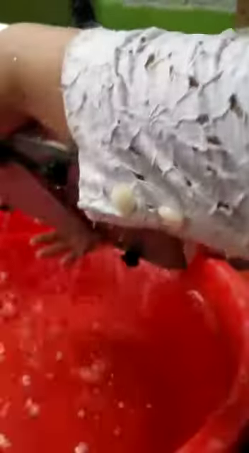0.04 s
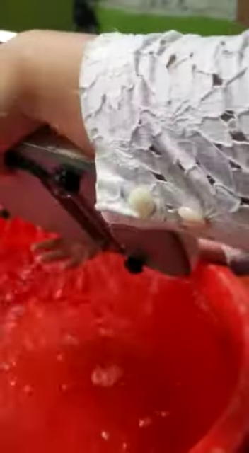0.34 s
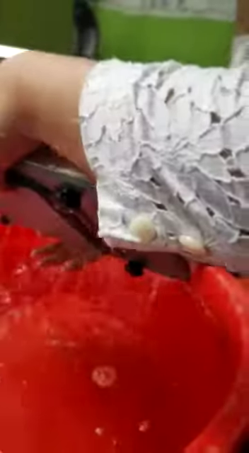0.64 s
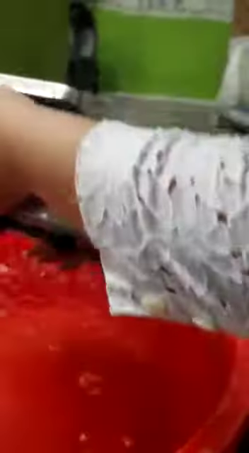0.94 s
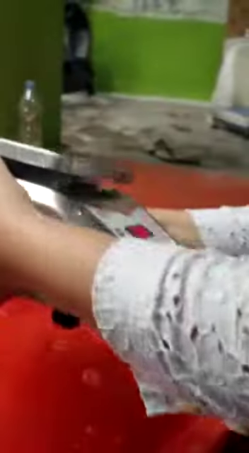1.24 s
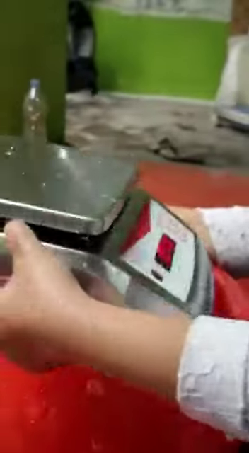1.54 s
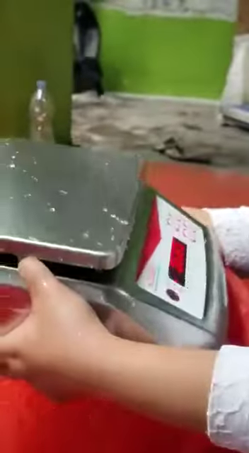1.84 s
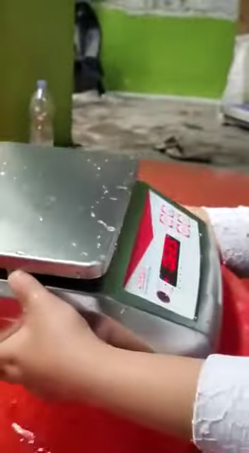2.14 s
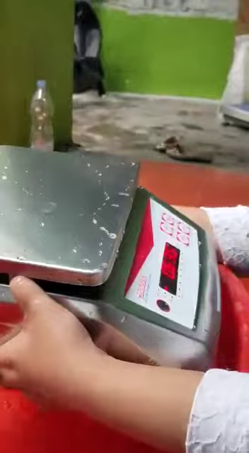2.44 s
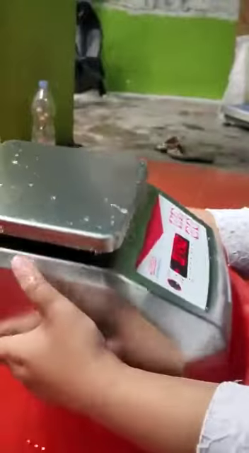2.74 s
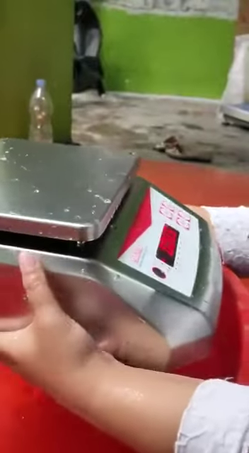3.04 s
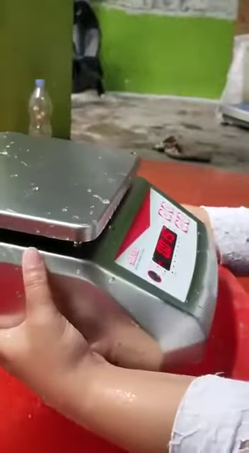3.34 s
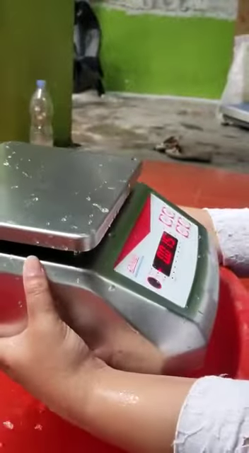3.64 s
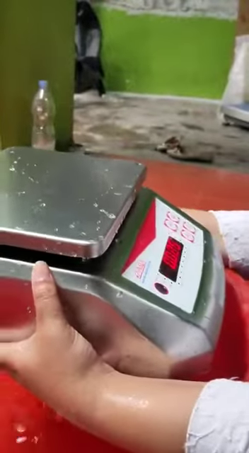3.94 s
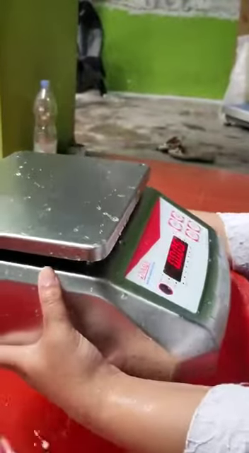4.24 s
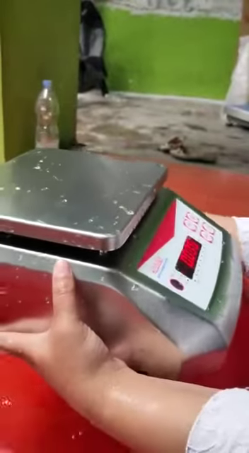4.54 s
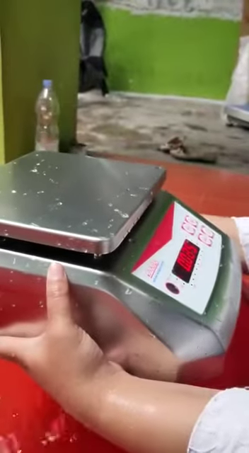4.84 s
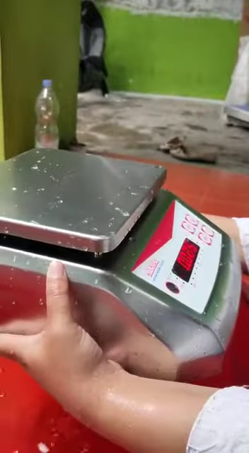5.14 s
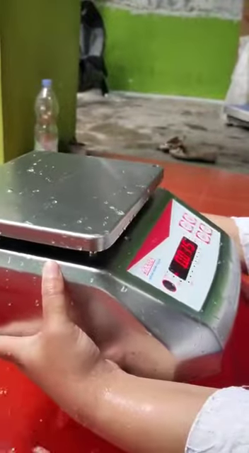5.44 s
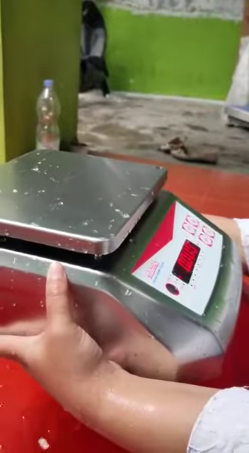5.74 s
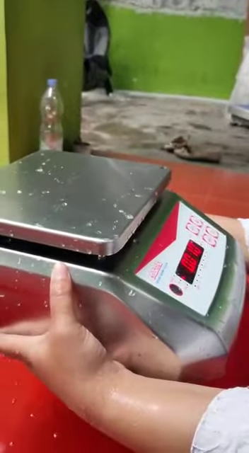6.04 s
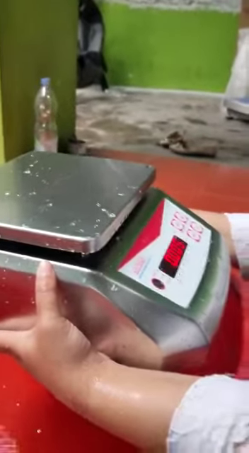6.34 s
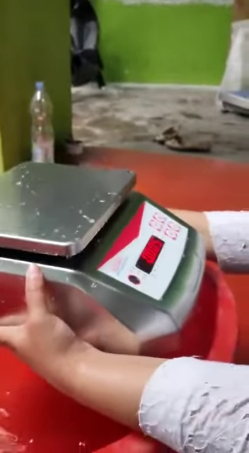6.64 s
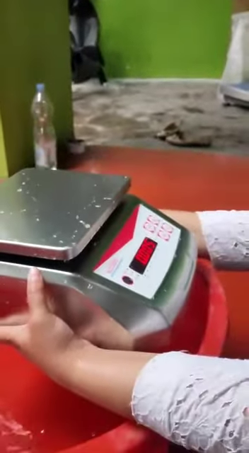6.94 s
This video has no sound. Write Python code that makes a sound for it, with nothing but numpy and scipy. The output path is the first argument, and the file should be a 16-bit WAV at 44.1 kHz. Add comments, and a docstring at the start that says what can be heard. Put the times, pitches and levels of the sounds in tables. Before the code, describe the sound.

From the start, water pours off a wet weighing scale into a plastic basin, a close, bright patter of splashes, fine spray and ringing bubbles. It eases gradually and drops to a thin trickle at about 2.3 seconds. The trickle picks up slightly between 3.4 and 4.2 seconds, then breaks into separate drips, higher in pitch and sparse from 6 seconds until the end near 7. A distant dove coos faintly in the first 0.7 seconds and again from about 2.7 to 4.4 seconds. A faint hollow hum swells on and off until 2.6 seconds. Soft, low handling rumble comes at about 2.5 seconds and between 3.5 and 4.4. Wet hands slip very quietly on the housing around 4.3 to 4.7 seconds and near 6.6. The room is small and hard, adding a short echo over a faint low background noise.

```python
"""A small hard room: a wet weighing scale is lifted out of a plastic basin and held above it.
Water pours off, thins to a trickle, then to single drips. Drops crack on the surface and trap
bubbles that ring, rising in pitch. A dove coos far off, a faint hum and a handling rumble come
and go, and wet hands slip on the housing. Two microphone ports colour the water differently."""
import sys
import numpy as np
from scipy import signal
from scipy.fft import rfft, irfft
from scipy.io import wavfile
from scipy.ndimage import uniform_filter1d, map_coordinates

SR = 44100
rng = np.random.default_rng(int(sys.argv[2]) if len(sys.argv) > 2 else 0)


def inscribe(sig):
    """Save sig as 16-bit PCM at rate SR to the path in sys.argv[1].

    A 1-D sig is mono; a 2-D sig holds one channel per row.
    Samples are clipped to [-1, 1] before scaling.
    """
    pcm = np.round(np.clip(np.atleast_2d(sig).T, -1, 1) * 32767)
    wavfile.write(sys.argv[1], SR, pcm.astype(np.int16))


N = 308252
TIME_S = np.arange(N) / SR
FULL_FLOW_DB, POUR_DROPS_PER_S, THINNING_POWER = -52, 900, 1.25
LOWEST_WATER_HZ, CUTOFF_HZ = 610, 15900

# Water running off. Each row: time in seconds, bubbling level in dB, spray level in dB.
RUNOFF = [(0.0, -50, -54.5), (0.47, -51, -58.5), (1.13, -54, -60), (2.06, -54, -62), (2.32, -63, -67),
          (2.59, -63, -64.5), (3.02, -61, -75), (3.43, -58, -64), (4.11, -58, -65.5), (4.71, -65.5, -74.5),
          (5.1, -66.5, -77.5), (5.35, -63.5, -72.5), (5.6, -65, -69.5), (5.71, -73, -73.5),
          (5.9, -65, -76.5), (6.01, -66, -75.5), (6.31, -73, -84), (6.99, -75, -74.5)]
# Largest bubble in the patter. Each row: time in seconds, pitch in Hz.
LOWEST_PITCH = [(0, 720), (1.05, 734), (1.6, 930), (2.0, 1144), (2.3, 1420), (2.9, 1460), (3.4, 1138),
                (4.1, 1320), (4.7, 1600), (5.5, 1594), (5.9, 2000), (6.1, 1540), (6.99, 1720)]
# Clear bubbles. Each row: start in seconds, level in dB, pitch in Hz,
# fractional pitch rise per swell time, left minus right in dB.
CLEAR_BUBBLES = [(0.022, -42.5, 6700, 0.07, -3), (0.0385, -40, 750, 0.02, 4), (0.0635, -40, 740, 0.08, -3),
                 (0.069, -38, 702, 0.09, -1), (0.0725, -35, 1815, 0.02, -3), (0.0874, -31.5, 2320, 0.08, 5),
                 (0.1044, -42, 4500, 0.02, 10), (0.103, -41, 1560, 0, -2), (0.105, -37.5, 2200, 0, -2),
                 (0.132, -40, 2390, 0, 4), (0.1365, -36.5, 1490, 0.12, 2), (0.1524, -46, 2580, 0.04, -3),
                 (0.166, -39, 5500, 0.03, 0), (0.2313, -40, 6920, 0.0, -9), (0.2466, -40, 2670, 0.05, -1),
                 (0.2543, -43.5, 1067, 0, -4), (0.2576, -38.5, 1510, 0.08, 2), (0.261, -42, 2520, 0, 5),
                 (0.2751, -37, 801, 0.02, 0), (0.2868, -38.5, 6000, 0.05, -7), (0.309, -39, 705, 0.12, -1),
                 (0.327, -38, 2214, 0.03, 0), (0.3474, -41, 2460, 0.01, -3), (0.348, -38, 2870, 0.05, 4),
                 (0.3575, -33, 1800, 0.04, 1), (0.379, -34.5, 1230, 0.02, -6),
                 (0.385, -39.5, 5210, 0.05, -16), (0.3848, -43, 2060, 0.03, 10),
                 (0.3951, -37.5, 736, 0.08, 2), (0.41, -39, 2760, 0.06, 10), (0.4248, -37.5, 1440, 0.04, 0),
                 (0.424, -36, 1960, 0.2, 3), (0.4376, -37.5, 5650, 0.08, -12),
                 (0.4366, -49, 6300, 0.09, -15), (0.4395, -43, 1276, 0.05, -3), (0.4406, -43, 833, 0.05, 3),
                 (0.4954, -40, 6540, 0.01, -5), (0.5121, -37.5, 2450, 0.01, 10),
                 (0.527, -32.5, 1620, 0.1, 0), (0.533, -47, 6400, 0, -4), (0.547, -41, 880, 0.01, 4),
                 (0.602, -38.5, 2230, 0.05, 2), (0.6404, -39, 970, 0.07, -1), (0.6424, -36, 1810, 0.06, -3),
                 (0.6463, -36.5, 1786, 0.02, -6), (0.6625, -50, 1420, 0, 0), (0.6771, -38, 2450, 0, 0),
                 (0.7173, -39, 3100, 0.02, 4), (0.7227, -39, 947, 0.12, -1), (0.7401, -38, 628, 0.09, 1),
                 (0.7492, -33.5, 2568, 0.0, 4), (0.794, -34.5, 1783, 0.06, -2),
                 (0.7953, -36, 2340, 0.04, 4), (0.8117, -43.5, 1133, 0.0, -3), (0.8914, -40, 802, 0.02, 3),
                 (0.9028, -39.5, 763, 0.06, 5), (0.9493, -39.5, 2450, 0.0, 7),
                 (0.9768, -36.5, 813, 0.06, 4), (0.9763, -28, 2328, 0.0, 5), (0.988, -36.5, 1726, 0.03, -3),
                 (0.9936, -36.5, 702, 0.07, 0), (1.0003, -45, 750, 0, 15), (1.0277, -53, 1940, 0, 33),
                 (1.0281, -39, 736, 0.27, 1), (1.087, -40, 2070, 0, 14), (1.0972, -40, 1280, 0.01, -7),
                 (1.193, -42, 1083, 0.13, 1), (1.2404, -40.5, 940, 0.06, 0), (1.347, -41, 917, 0.01, 1),
                 (1.3892, -36.5, 2200, 0.01, 10), (1.4047, -35.5, 1184, 0.03, -3),
                 (1.474, -43.5, 874, 0, 0), (1.516, -48, 1400, 0, -4), (1.517, -40.5, 2570, 0.08, 4),
                 (1.557, -44.5, 1295, 0.0, -1), (1.567, -45, 2210, 0.12, 6),
                 (1.5946, -44.5, 1780, 0.12, -12), (1.5965, -50, 6200, 0, -1),
                 (1.6125, -38.5, 2350, 0.03, 7), (1.623, -40, 1380, 0.13, 2), (1.6284, -40.5, 866, 0, -3),
                 (1.6377, -53, 1590, 0.2, -13), (1.7115, -42.5, 1644, 0.06, -4),
                 (1.725, -41, 2240, 0.05, 8), (1.7374, -46, 1520, 0.03, -2), (1.801, -41.5, 6280, 0.05, 2),
                 (1.814, -37.5, 2574, 0.0, 5), (1.8668, -42.5, 1680, 0.01, -4),
                 (1.8995, -42.5, 1610, 0.32, 1), (1.9849, -43, 1704, 0.02, -6), (2.01, -42.5, 2520, 0.0, 2),
                 (2.017, -50, 1310, 0.0, -9), (2.0367, -43, 1158, 0.0, -2), (2.103, -36.5, 2344, 0.06, 6),
                 (2.136, -46, 1460, 0.06, -4), (2.1764, -41.5, 2700, 0.05, 7),
                 (2.2033, -40.5, 2440, 0.06, 9), (2.2036, -45.5, 1265, 0.11, -1),
                 (2.2104, -53, 1360, 0.15, -11), (2.268, -47, 2200, 0.02, 9), (2.33, -52.5, 1386, 0, -3),
                 (2.4589, -46, 2080, 0.02, 7), (2.5165, -47.5, 6520, 0, -2), (2.572, -45.5, 1516, 0.02, -2),
                 (2.631, -41, 5930, 0.03, -4), (2.7293, -48.5, 1860, 0.07, 3), (2.771, -50, 1460, 0, -3),
                 (2.7767, -48.5, 6150, 0, 0), (2.8537, -49.5, 1660, 0.01, -15), (2.896, -57, 2780, 0, 12),
                 (2.914, -45.5, 3070, 0, 15), (2.962, -47.5, 1580, 0.08, 0), (3.0123, -46, 3930, 0.05, 5),
                 (3.1473, -44, 1650, 0.05, -4), (3.1932, -47.5, 2200, 0.0, 1),
                 (3.2083, -47.5, 1900, 0.01, 2), (3.2478, -49.5, 1500, 0.03, 4),
                 (3.2814, -53, 1830, 0.02, -5), (3.3324, -47.5, 1420, 0.14, 4),
                 (3.3566, -43.5, 2960, 0, 27), (3.375, -49.5, 6140, 0.02, -8),
                 (3.379, -44.5, 2570, 0.02, 6), (3.3997, -46.5, 1190, 0.1, 3), (3.416, -43, 1360, 0.0, -2),
                 (3.475, -41.5, 6450, 0.02, -2), (3.5454, -39, 2410, 0.04, 13),
                 (3.6705, -42, 2054, 0.14, 6), (3.6757, -54, 2510, 0.24, 4), (3.745, -46, 2866, 0.02, 5),
                 (3.8475, -46.5, 2230, 0.0, 10), (3.93, -46, 1520, 0.07, -8), (3.947, -48, 4870, 0.03, -5),
                 (3.984, -48, 1660, 0.07, 8), (4.022, -47.5, 2040, 0, 2), (4.024, -41, 2800, 0.08, 6),
                 (4.027, -49.5, 6300, 0.0, -12), (4.0792, -50, 6500, 0, -4), (4.112, -42.5, 1556, 0.03, 5),
                 (4.113, -43.5, 2840, 0.07, 10), (4.15, -48.5, 5430, 0.04, 0),
                 (4.158, -42.5, 2434, 0.04, 4), (4.217, -45.5, 1980, 0.08, 6),
                 (4.2182, -42.5, 1450, 0.0, -4), (4.2209, -47, 6200, 0.02, -1), (4.2883, -53, 1690, 0.0, 7),
                 (4.2907, -49.5, 6640, 0, -3), (4.3027, -45, 1570, 0.05, -4), (4.408, -49.5, 1506, 0.05, 2),
                 (4.453, -41.5, 2403, 0.06, 11), (4.5022, -50, 2340, 0.0, -1),
                 (4.54, -45.5, 2030, 0.02, -2), (4.568, -48.5, 1710, 0.0, -2),
                 (4.5914, -46, 5800, 0.02, -5), (4.653, -51, 1617, 0, -5), (4.71, -49, 1600, 0.16, 5),
                 (4.711, -47.5, 2690, 0.01, 9), (4.7897, -49.5, 2150, 0.02, 3), (4.885, -51.5, 1550, 0, -4),
                 (4.9236, -52, 2930, 0.09, 8), (4.961, -51.5, 6370, 0, -4), (4.965, -50, 1760, 0.05, -14),
                 (5.013, -48, 1610, 0.04, -4), (5.0295, -43.5, 1610, 0.09, -4),
                 (5.0313, -48.5, 1843, 0.2, -8), (5.037, -47, 2550, 0.03, 12), (5.057, -45, 1475, 0.0, -9),
                 (5.109, -52, 2400, 0.05, 7), (5.171, -51, 5670, 0.07, 1), (5.172, -48.5, 1670, 0.07, -8),
                 (5.183, -51, 1660, 0, -4), (5.2371, -51.5, 1820, 0, -7), (5.2733, -51, 2190, 0.0, 1),
                 (5.2968, -47.5, 2000, 0.05, 17), (5.3235, -53, 5960, 0, -23), (5.3254, -47, 3260, 0.05, 7),
                 (5.324, -48, 1630, 0.09, -7), (5.4231, -49.5, 1760, 0.02, -6),
                 (5.4285, -46, 2470, 0.04, 7), (5.428, -45, 1606, 0.01, 1), (5.4883, -54, 1610, 0.02, -3),
                 (5.514, -47, 2020, 0.01, 15), (5.549, -55, 3480, 0.05, 7), (5.579, -49.5, 2130, 0.22, 7),
                 (5.5816, -55, 1660, 0, 7), (5.5963, -49.5, 1730, 0.03, -5), (5.631, -54.5, 2980, 0.09, 6),
                 (5.7506, -43, 1824, 0.06, -6), (5.829, -40, 2650, 0.06, 8), (5.8355, -56, 4920, 0.03, -10),
                 (5.862, -50, 2180, 0.01, 2), (5.8852, -47, 2115, 0.04, 4), (5.8856, -49, 3810, 0.04, -5),
                 (5.893, -52, 6060, 0.03, -2), (5.901, -52, 2230, 0.02, 15), (5.927, -58.5, 4130, 0.1, 3),
                 (5.948, -41.5, 2600, 0.02, 11), (5.9825, -47.5, 2900, 0.01, 6), (5.9842, -46, 5450, 0, 2),
                 (6.004, -52, 3170, 0.02, 15), (6.031, -51, 1556, 0, -9), (6.037, -49.5, 2910, 0.04, 17),
                 (6.08, -60, 5660, 0.01, -7), (6.107, -50.5, 1950, 0.01, 4), (6.196, -52.5, 6680, 0.01, -5),
                 (6.3108, -47, 3150, 0.01, 7), (6.382, -54.0, 2560, 0.01, 19), (6.394, -62, 6600, 0, -5),
                 (6.423, -59.5, 1760, 0, -4), (6.526, -60, 7000, 0, -8), (6.548, -61, 1800, 0.03, -9),
                 (6.5773, -57, 4420, 0.07, -15), (6.5944, -48.5, 2684, 0.0, 9), (6.6529, -59, 4520, 0, -10),
                 (6.7069, -45, 1860, 0.04, -0.5), (6.903, -59.5, 1650, 0, -1),
                 (6.906, -56.5, 3330, 0.04, 4)]
# Big drops landing. Each row: start in seconds, level in dB.
BIG_DROPS = [(0.0248, -59), (0.071, -41), (0.105, -59), (0.133, -38), (0.1665, -33.5), (0.1853, -50),
             (0.2306, -58), (0.2473, -57), (0.2869, -41), (0.3843, -30), (0.5303, -38.5), (0.5537, -37.5),
             (0.6433, -36.5), (0.6635, -36), (0.705, -32.5), (0.7193, -58), (0.795, -36), (0.81, -48),
             (0.9765, -36), (1.029, -42.5), (1.259, -41), (1.2792, -37.5), (1.4597, -38.5), (1.5161, -48),
             (1.6808, -37), (1.762, -41), (1.7997, -42.5), (1.8172, -63), (2.01, -41.5), (2.0929, -37.5),
             (2.253, -47), (2.475, -41.5), (2.7776, -44.5), (3.0114, -41), (3.2044, -49.5), (3.217, -68),
             (3.318, -45), (3.6853, -40.5), (3.948, -54), (4.029, -58), (4.0793, -60), (4.111, -46),
             (4.2208, -46), (4.555, -48), (4.925, -56), (5.031, -57.5), (5.17, -56), (5.3256, -45.5),
             (5.4245, -56.5), (5.4875, -51), (5.8869, -55), (5.985, -46)]
# Dove calls, one curve per coo. Each row: time in seconds, pitch in Hz, level in dB.
COO_CURVES = [
    [(.05, 705, -55), (.11, 670, -56), (.2, 648, -66), (.26, 650, -89)],
    [(.43, 690, -66), (.49, 688, -54), (.58, 679.5, -50), (.66, 640, -76)],
    [(2.675, 669, -107), (2.705, 680, -57), (2.74, 629, -68), (2.77, 617, -87)],
    [(2.975, 660, -71), (2.995, 682, -62), (3.022, 770, -57), (3.07, 802, -69.5), (3.12, 791, -57),
     (3.145, 776, -53), (3.175, 672, -56.5), (3.22, 696, -97)],
    [(3.33, 656, -65), (3.352, 655, -57), (3.385, 751, -59), (3.5, 774, -61.5), (3.61, 758, -55.5),
     (3.73, 749, -58.5), (3.775, 687, -54), (3.83, 664, -66), (3.9, 641, -68)],
    [(4.085, 670, -68), (4.13, 686, -54), (4.24, 686, -52), (4.28, 653, -76), (4.35, 677, -65),
     (4.41, 594, -73)],
]
# Swells of hum and of rumble. Each row: start in seconds, end in seconds, level in dB.
HUM_SPANS = [(.15, .31, -63.5), (.44, .6, -62), (1.09, 1.2, -63.5), (1.34, 1.7, -59.5), (1.825, 1.9, -60.5),
             (1.97, 2.06, -67.5), (2.09, 2.22, -68), (2.45, 2.6, -67.5)]
RUMBLE_SPANS = [(2.45, 2.61, -66), (3.55, 3.67, -67.5), (3.78, 4.1, -63.5), (4.27, 4.41, -68)]
# Wet hands slipping. Each row: start in seconds, length in seconds, centre in Hz, level in dB.
HAND_SLIPS = [(4.3, 0.11, 8900, -77.5), (4.565, 0.18, 6400, -76.5), (4.648, 0.083, 11500, -79.5),
              (6.569, 0.14, 4400, -81), (6.62, 0.12, 2940, -76), (6.725, 0.049, 9800, -85.5)]
# Source spectra. Each row: frequency in Hz, relative level in dB.
BUBBLE_SPECTRUM = [(650, 10.5), (900, 2), (1300, 4.5), (1800, 3.5), (2500, -0.5), (3100, 3), (3800, -28.5),
                   (5000, 31)]
SPRAY_SPECTRUM = [(1000, -22), (1550, 6), (2500, 3.5), (3300, 0), (4000, -4.5), (5000, -1.5), (6050, -8.5),
                  (6320, 7), (6600, -6), (7400, -5), (9000, -13.5), (12500, -15), (15800, -11.5)]
BACKGROUND_SPECTRUM = [(15, -39), (25, -3), (60, 0.5), (178, -2), (237, -10), (291, -7), (523, -19),
                       (1100, -25), (1430, -80), (2420, -120)]
SPLAT_SPECTRUM = [(1000, -36.5), (1600, 3), (2800, 10), (4100, -0.5), (5200, 3), (6050, -1.5), (6320, 11.5),
                  (6700, 3.5), (7600, 1), (9000, -7), (12500, -22), (15800, -31)]
HUM_SPECTRUM = [(220, -32.5), (290, -18.5), (345, -27), (375, -8), (388, -9.5), (401, 8.5), (411, -12),
                (421, 2), (440, -22.5), (480, -19.5), (600, -53.5)]
RUMBLE_SPECTRUM = [(70, -35), (110, -7.5), (137, 6), (165, -5), (193, 1), (240, -14.5), (350, -60)]
# Microphone port balance. Each row: frequency in Hz, left minus right in dB.
PORT_BALANCE = [(100, -13), (500, -16), (800, 4), (1150, -4), (1700, -1.5), (2100, 7.5), (3000, 5.5),
                (3800, 1.5), (4600, -4), (6500, 0), (15000, -3)]


def from_db(db):
    """Decibels to gain."""
    return 10 ** (np.asarray(db) / 20)


def unit_rms(x):
    """Scale to unit power."""
    return x / np.sqrt(np.mean(x ** 2) + 1e-20)


def in_time(rows):
    """Each column of a curve at every sample."""
    times_s, *columns = np.transpose(rows)
    return [np.interp(TIME_S, times_s, column) for column in columns]


def db_at(spectrum, hz):
    """Read a spectrum on a log-frequency axis."""
    knots_hz, db = np.transpose(spectrum)
    return np.interp(np.log(np.maximum(hz, 1)), np.log(knots_hz), db)


def colour(x, spectrum, size=4096):
    """Minimum-phase filter with the given spectrum."""
    bins_hz = np.arange(size // 2 + 1) * SR / size
    cepstrum = irfft(np.log(from_db(db_at(spectrum, bins_hz))))
    cepstrum[1:size // 2] *= 2
    cepstrum[size // 2 + 1:] = 0
    response = irfft(np.exp(rfft(cepstrum)))
    return signal.fftconvolve(np.atleast_2d(x), response[None], axes=1)[:, :N]


def butterworth(x, order, hz, kind):
    """Causal Butterworth filter."""
    return signal.sosfilt(signal.butter(order, hz, kind, fs=SR, output="sos"), x)


def drift(hz):
    """Smooth random curve, unit RMS, changing at about this rate."""
    knots = rng.standard_normal(3200)
    return unit_rms(map_coordinates(knots, [TIME_S * 2 * hz], order=3, mode="mirror"))


def stereo_noise(side_db):
    """White mid/side noise."""
    mid, side = rng.standard_normal((2, N))
    return mid + from_db(side_db) * side * [[1], [-1]]


def panned(db):
    """Constant-power gains for a left-minus-right level."""
    return unit_rms(from_db(np.array([[db], [-db]]) / 2))


def ports(x):
    """Each microphone port favours its own bands."""
    bands_hz = [hz for hz, _ in PORT_BALANCE]
    gains_db = np.array([20 * np.log10(panned(db)[:, 0]) for _, db in PORT_BALANCE])
    return np.vstack([colour(x[k], np.c_[bands_hz, gains_db[:, k]]) for k in range(2)])


def add(out, start_s, sound):
    """Mix a sound in at start_s."""
    i = int(np.clip(round(start_s * SR), 0, N - 1))
    out[:, i:i + sound.shape[-1]] += sound[..., :N - i]


def swells(spans, edge_s):
    """Gain ramping up and down within each span."""
    return sum(from_db(db) * np.clip(np.minimum(TIME_S - start_s, end_s - TIME_S) / edge_s, 0, 1)
               for start_s, end_s, db in spans)


def flow():
    """Run-off strength; 1 is a full pour."""
    return np.minimum(from_db(in_time(RUNOFF)[0] - FULL_FLOW_DB), 1)


def flow_at_plinks():
    """Run-off strength as each clear bubble starts."""
    return np.interp([row[0] for row in CLEAR_BUBBLES], TIME_S, flow())


def drops_per_s():
    """Drop rate, falling with the flow."""
    return POUR_DROPS_PER_S * flow() ** THINNING_POWER


def swell_s(hz):
    """Nominal time to peak; larger, lower bubbles take longer."""
    return 0.0028 * np.sqrt(1550 / hz)


def bubble(hz, peak_s, climb, lead_rad):
    """Trapped air swells and rings out, rising in pitch; the left channel leads by lead_rad."""
    age = np.arange(1200) / SR / max(peak_s, 1e-4)
    phase = 2 * np.pi * np.cumsum(hz * (1 + climb * np.minimum(age, 5))) / SR
    return age * np.exp(1 - age), np.sin(phase + np.array([[lead_rad], [-lead_rad]]) / 2)


def small_bubble(hz, peak_s, climb, lead_rad):
    """A bubble's ring with a slightly narrowed envelope."""
    envelope, tone = bubble(hz, peak_s, climb, lead_rad)
    return envelope ** 1.16 * tone


def trickle(level_db, spread_db, peak_s, climb, top_hz, pan_spread_db, count=9000):
    """Many small bubbles, fewer and higher as the flow thins."""
    per_s, lowest_hz, bubbling_db = drops_per_s(), in_time(LOWEST_PITCH)[0], in_time(RUNOFF)[0]
    out = np.zeros((2, N))
    draws = zip(rng.random((count, 5)), rng.standard_normal((count, 3)))
    for (when, keep, pitch, life, rise), (size, pan, lead) in draws:
        i = int(when * N)
        if keep > per_s[i] * N / SR / count:
            continue
        hz = lowest_hz[i] * (top_hz / lowest_hz[i]) ** pitch
        db = level_db + bubbling_db[i] + db_at(BUBBLE_SPECTRUM, hz) + spread_db * min(size, 1.5)
        gain = from_db(db) / np.sqrt(per_s[i] * peak_s)
        ring = small_bubble(hz, peak_s * (.5 + life), climb * rise, lead * hz / 2000)
        add(out, i / SR, gain * panned(-pan_spread_db * pan) * ring)
    return ports(out)


def spray(level_db, spread_db, ticks_per_drop, tick_s, mist_db, dull_hz, bright_per_s):
    """Tiny droplet cracks merge into a hiss, brighter in fast flow."""
    per_s = drops_per_s()
    ticks_per_s = per_s * ticks_per_drop
    hits = rng.random(N) < ticks_per_s / SR
    ticks = hits * from_db(spread_db * np.minimum(rng.exponential(1, N), 3.5))
    tick_power = ticks ** 2 / ticks_per_s
    age = np.arange(900) / SR / tick_s
    crack = age * np.exp(-2 * age)
    power = np.abs(signal.fftconvolve(tick_power / tick_power.mean(), crack / crack.sum())[:N])
    envelope = np.sqrt(power + from_db(mist_db) ** 2) * from_db(in_time(RUNOFF)[1] + level_db)
    hiss = colour(stereo_noise(0.75) * envelope, SPRAY_SPECTRUM)
    dull = butterworth(hiss, 6, dull_hz, "low")
    brightness = np.clip(per_s / bright_per_s, 0, 1)
    return ports(np.sqrt(1 - brightness ** 2) * dull + brightness * hiss)


def fizz(level_db, centre_hz, log_spread, peak_s, spread_db, climb, count):
    """The tiniest bubbles ping high, more often in fast flow."""
    births = np.cumsum(np.sqrt(drops_per_s()))
    spray_db = in_time(RUNOFF)[1]
    out = np.zeros((2, N))
    for when, (pitch, size, pan, lead) in zip(rng.random(count), rng.standard_normal((count, 4))):
        i = np.searchsorted(births, when * births[-1])
        gain = from_db(level_db + spray_db[i] + spread_db * min(size, 1.5))
        ring = small_bubble(centre_hz * np.exp(log_spread * pitch), peak_s, climb, 2 * lead)
        add(out, i / SR, gain * panned(5 * pan - 3) * ring)
    return out


def drips(level_db, spread_db, flow_power, top_hz, climb, pan_spread_db, count=110):
    """Mid-size drops fall unevenly from the edges, fading less than the flow does."""
    strength, lowest_hz = flow(), in_time(LOWEST_PITCH)[0]
    births = np.cumsum(strength ** .8)
    out = np.zeros((2, N))
    draws = zip(rng.random((count, 3)), rng.standard_normal((count, 3)))
    for k, ((when, pitch, loss), (rise, pan, lead)) in enumerate(draws):
        i = np.searchsorted(births, (k + when) / count * births[-1])
        hz = lowest_hz[i] * (top_hz / lowest_hz[i]) ** pitch
        gain = from_db(level_db - spread_db * loss) * strength[i] ** flow_power
        ring = small_bubble(hz, swell_s(hz), climb * abs(rise), lead * hz / 2000)
        add(out, i / SR, gain * panned(db_at(PORT_BALANCE, hz) + pan_spread_db * pan) * ring)
    return out


def gulps(depth_db, settle_s):
    """Thin flow leaves in gulps: the patter's gain jumps at each clear bubble, then settles."""
    starts = [int(row[0] * SR) for row in CLEAR_BUBBLES]
    weights = [from_db(row[1] / 2) for row in CLEAR_BUBBLES]
    kicks = np.bincount(starts, weights, minlength=N)[:N]
    recent = signal.lfilter([1], [1, -np.exp(-1 / (settle_s * SR))], kicks + 1e-18)
    usual = uniform_filter1d(recent, size=30000) + recent.mean() / 20
    return from_db(depth_db * (1 - flow()) * (np.clip(recent / usual, 0, 1.6) - 0.69))


def sparkle(level_db, low_hz, peak_s, spread_db, burst_s, bursts=170, per_burst=5):
    """Minute droplets crackle in short, high-treble bursts."""
    births = np.cumsum(drops_per_s() ** 0.85)
    spray_db = in_time(RUNOFF)[1]
    out = np.zeros((2, N))
    for (when, loss), draws in zip(rng.random((bursts, 2)), rng.random((bursts, per_burst, 4))):
        i = np.searchsorted(births, when * births[-1])
        gain = from_db(level_db + spray_db[i] - spread_db * loss)
        for late, pitch, pan, lead in draws:
            ring = small_bubble(low_hz + pitch * (CUTOFF_HZ - low_hz), peak_s, 0, 2 * np.pi * lead)
            add(out, i / SR + burst_s * late, gain * panned(16 * (pan - .5)) * ring)
    return out


def reflections(x, level_db, t60_s, delay_s, dull_hz, wide_above_hz):
    """Dense, delayed, decaying echoes; centred in the bass, wide in the treble."""
    age_s = np.arange(26000) / SR
    envelope = from_db(-60 * age_s / t60_s) * np.clip(age_s / delay_s - 1, 0, 1)
    mid, side = rng.standard_normal((2, age_s.size)) * envelope
    side = butterworth(side, 1, wide_above_hz, "high")
    response = mid + side * [[1], [-1]]
    response /= np.sqrt(np.sum(response ** 2, axis=1, keepdims=True))
    pole = np.exp(-2 * np.pi * dull_hz / SR)
    response = signal.lfilter([1 - pole], [1, -pole], response)
    return from_db(level_db) * signal.fftconvolve(x, response, axes=1)[:, :N]


def background(low_db, hiss_db):
    """Steady low noise and faint white hiss."""
    low = unit_rms(colour(stereo_noise(-14), BACKGROUND_SPECTRUM))
    return from_db(low_db) * low + from_db(hiss_db) * rng.standard_normal((2, N))


def impacts(level_db, crack_s, spread_db, ahead_s, drip_loss_db):
    """A drop cracks on the surface just before its bubble rings; lone drips land softer."""
    age = np.arange(900) / SR / crack_s
    losses_db = drip_loss_db * (1 - flow_at_plinks()) + spread_db * rng.random(len(CLEAR_BUBBLES))
    out = np.zeros((2, N))
    for (start_s, db, *_), loss_db in zip(CLEAR_BUBBLES, losses_db):
        crack = age * np.exp(1 - age) * rng.standard_normal((2, age.size))
        add(out, start_s - ahead_s, from_db(db + level_db - loss_db) * crack)
    return ports(colour(out, SPLAT_SPECTRUM))


def plinks(lead_spread, length_spread, drip_stretch):
    """Clear bubbles ring one by one, shorter as the flow thins."""
    stretches = drip_stretch ** (1 - flow_at_plinks())
    draws = rng.standard_normal((len(CLEAR_BUBBLES), 2))
    out = np.zeros((2, N))
    for (start_s, db, hz, climb, pan_db), stretch, (lead, life) in zip(CLEAR_BUBBLES, stretches, draws):
        peak_s = swell_s(hz) * stretch * np.exp(length_spread * life)
        envelope, tone = bubble(hz, peak_s, climb, lead_spread * lead * min(hz / 2000, 2))
        add(out, start_s, from_db(db) / np.sqrt(stretch) * panned(pan_db) * envelope * tone)
    return out


def splats(level_db, crack_s, wash_db, wash_s):
    """A big drop lands with a wet crack, then its splash washes out."""
    age_s = np.arange(4000) / SR
    crack = age_s / crack_s * np.exp(1 - age_s / crack_s)
    wash = from_db(wash_db) * np.sqrt(age_s / wash_s) * np.exp(-age_s / wash_s)
    out = np.zeros((2, N))
    for start_s, db in BIG_DROPS:
        add(out, start_s, from_db(db + level_db) * (crack + wash) * rng.standard_normal((2, age_s.size)))
    return ports(colour(out, SPLAT_SPECTRUM))


def droplets(level_db, fall_s, low_hz, high_hz, peak_s, climb, spread_db, per_splat=7):
    """Droplets thrown up by each splat fall back and trap tiny bubbles."""
    out = np.zeros((2, N))
    for (start_s, db), draws in zip(BIG_DROPS, rng.random((len(BIG_DROPS), per_splat, 5))):
        for late, pitch, loss, pan, lead in draws:
            ring = small_bubble(low_hz * (high_hz / low_hz) ** pitch, peak_s, climb, 2 * np.pi * lead)
            gain = from_db(db + level_db - spread_db * loss)
            add(out, start_s + fall_s * late ** 2, gain * panned(16 * (pan - .5)) * ring)
    return out


def offshoots(level_db, within_s, low_hz, high_hz, pitch_ratio, climb, per_bubble=2):
    """A large bubble's closing cavity sheds lesser ones; the later, the higher."""
    draws = rng.random((len(CLEAR_BUBBLES), per_bubble, 3))
    out = np.zeros((2, N))
    for (start_s, db, parent_hz, *_), shed in zip(CLEAR_BUBBLES, draws):
        if parent_hz > high_hz:
            continue
        first_hz = max(parent_hz, low_hz)
        for late, rise, lead in shed:
            hz = first_hz * min(pitch_ratio, high_hz / first_hz) ** late
            ring = small_bubble(hz, swell_s(hz) / 2, climb * rise, np.pi * (lead - .5))
            gains = from_db(db + level_db) * panned(db_at(PORT_BALANCE, hz))
            add(out, start_s + within_s * late, gains * ring)
    return out


def dove(level_db, roll_from_hz, roll_hz, roll_jitter, roll_bend, waver, husk_db, husk_hz, octave_db):
    """Far, husky coos in arches of pitch: nearly smooth when low, rolled into pulses when high."""
    roll = np.sin(2 * np.pi * np.cumsum(roll_hz * (1 + roll_jitter * drift(20))) / SR)
    bend = roll_bend * roll + waver * drift(30)
    husk = from_db(husk_db) * (drift(husk_hz) + 1j * drift(husk_hz))
    out = np.zeros(N)
    for coo in COO_CURVES:
        hz, db = in_time(coo)
        gate = uniform_filter1d(1.0 * ((TIME_S >= coo[0][0]) & (TIME_S <= coo[-1][0])), size=400)
        roll_depth = np.clip((hz - roll_from_hz) / 50, 0.14, 1)
        phase = 2 * np.pi * np.cumsum(hz * (1 + roll_depth * bend)) / SR
        fundamental = ((1 + np.sqrt(roll_depth) * husk) * np.exp(1j * phase)).real
        octave = from_db(octave_db) * np.sin(2 * phase)
        pulses = (1 + roll_depth * roll) / np.sqrt(1 + roll_depth ** 2)
        out += from_db(db + level_db) * gate * pulses * (fundamental + octave)
    return out * panned(0.65)


def hum(level_db, edge_s):
    """Hollow, throbbing hum: noise in a few close resonances."""
    noise = unit_rms(colour(stereo_noise(-22), HUM_SPECTRUM, size=16384))
    return from_db(level_db) * swells(HUM_SPANS, edge_s) * noise * panned(-1)


def rumble(level_db, edge_s):
    """Low, lumpy noise as the scale is handled."""
    noise = unit_rms(colour(stereo_noise(-15), RUMBLE_SPECTRUM))
    return from_db(level_db) * swells(RUMBLE_SPANS, edge_s) * noise * panned(3.7)


def slips(level_db, edge_ratio, grain_db):
    """Wet skin sticks and lets go in short, grainy smacks."""
    grain = from_db(grain_db * drift(150))
    out = np.zeros((2, N))
    for start_s, length_s, hz, db in HAND_SLIPS:
        band = butterworth(stereo_noise(-0.44), 2, [hz / edge_ratio, hz * edge_ratio], "band")
        age = np.clip((TIME_S - start_s) / length_s, 0, 1)
        out += from_db(db + level_db) * unit_rms(band * grain) * np.sin(np.pi * np.sqrt(age))
    return out


def scene():
    """Water, its echoes in basin and room, and the faint sounds beneath."""
    patter = trickle(level_db=-5, spread_db=3.5, peak_s=0.0014, climb=0.027, top_hz=3868,
                     pan_spread_db=5.5)
    patter += spray(level_db=3.5, spread_db=8.5, ticks_per_drop=1.4, tick_s=0.0037, mist_db=-12,
                    dull_hz=7600, bright_per_s=910)
    patter += fizz(level_db=3.5, centre_hz=6330, log_spread=0.104, peak_s=0.0011, spread_db=3,
                   climb=0.0046, count=900)
    patter += fizz(level_db=5.5, centre_hz=5690, log_spread=0.22, peak_s=0.0009, spread_db=5.5,
                   climb=0.015, count=130)
    patter += drips(level_db=-43.5, spread_db=4.5, flow_power=0.76, top_hz=3080, climb=0.03,
                    pan_spread_db=3)
    water = patter * gulps(depth_db=4, settle_s=0.035)
    water += plinks(lead_spread=0.92, length_spread=0.18, drip_stretch=0.82)
    water += impacts(level_db=-11.5, crack_s=0.00053, spread_db=19, ahead_s=0.0005, drip_loss_db=15.5)
    water += offshoots(level_db=-12, within_s=0.0088, low_hz=1516, high_hz=3285, pitch_ratio=1.785,
                       climb=0.041)
    water += splats(level_db=-4.5, crack_s=0.00089, wash_db=-14, wash_s=0.039)
    water += droplets(level_db=-8, fall_s=0.078, low_hz=3540, high_hz=8030, peak_s=0.00064,
                      climb=0.014, spread_db=21.5)
    water += sparkle(level_db=5, low_hz=7640, peak_s=0.00036, spread_db=19, burst_s=0.033)
    water += slips(level_db=8.5, edge_ratio=1.14, grain_db=5.5)
    water = butterworth(water, 4, LOWEST_WATER_HZ, "high")
    basin = reflections(water, -4.5, t60_s=0.038, delay_s=0.0011, dull_hz=8600, wide_above_hz=860)
    ringing = reflections(water, -10.5, t60_s=0.19, delay_s=0.0039, dull_hz=3550, wide_above_hz=900)
    room = reflections(water, -6, t60_s=0.49, delay_s=0.0056, dull_hz=6870, wide_above_hz=900)
    faint = dove(level_db=1, roll_from_hz=685, roll_hz=33.95, roll_jitter=0.3466, roll_bend=0.039,
                 waver=0.01, husk_db=-4.5, husk_hz=69.8, octave_db=-23)
    faint += hum(level_db=1, edge_s=0.038)
    faint += reflections(faint, 1.5, t60_s=0.38, delay_s=0.00048, dull_hz=5350, wide_above_hz=1440)
    floor = background(low_db=-73.5, hiss_db=-100)
    return water + basin + ringing + room + floor + faint + rumble(level_db=4, edge_s=0.032)


def record(dry):
    """Steep low-pass on the top treble."""
    return signal.sosfilt(signal.ellip(10, .2, 70, CUTOFF_HZ, fs=SR, output="sos"), dry)


dry = scene()
out = record(dry)
inscribe(out)
```